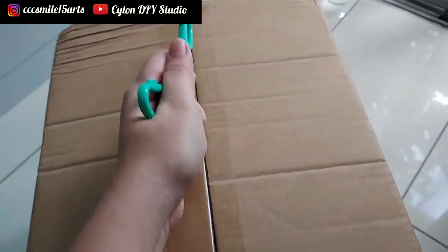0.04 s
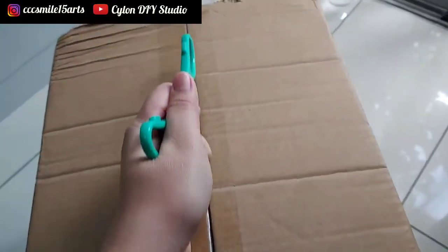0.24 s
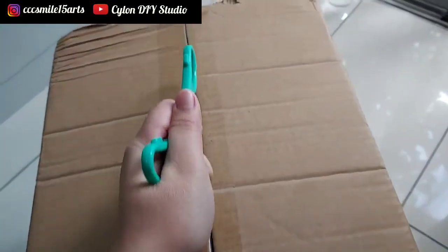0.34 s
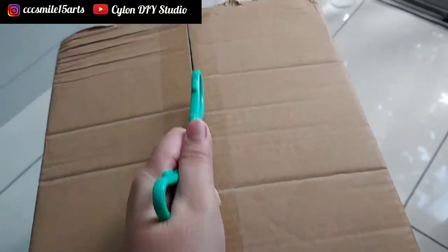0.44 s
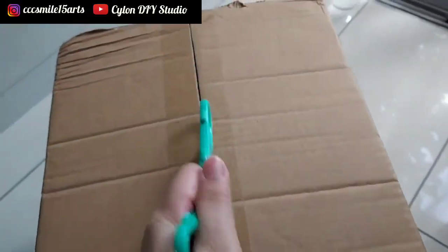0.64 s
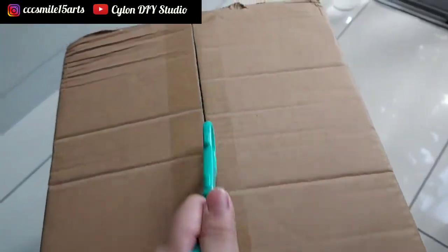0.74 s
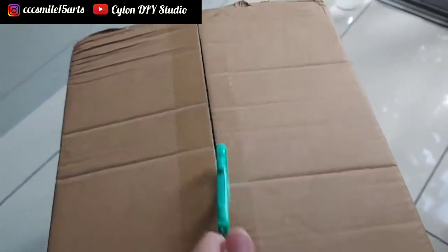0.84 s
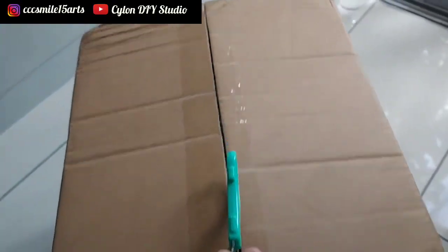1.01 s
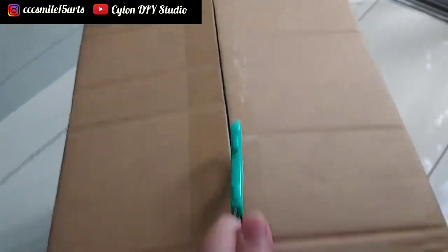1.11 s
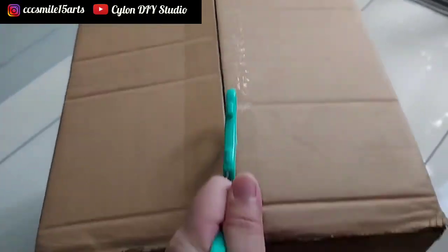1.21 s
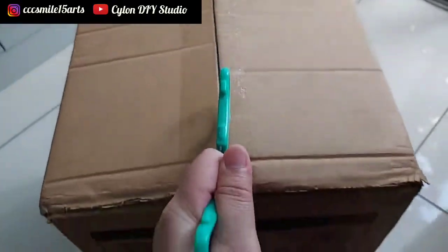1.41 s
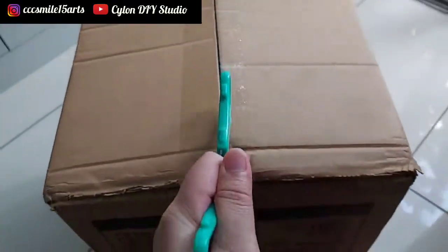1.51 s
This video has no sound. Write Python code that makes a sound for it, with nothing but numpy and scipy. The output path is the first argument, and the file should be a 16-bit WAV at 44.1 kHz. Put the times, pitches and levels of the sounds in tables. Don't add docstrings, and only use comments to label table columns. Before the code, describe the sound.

A scissor blade slits the taped seam of a big cardboard box, close in stereo. From 0.1 to 0.6 s it sticks and jumps: short hissy rips, fibre cracks, hollow thumps. The loudest snap comes at 0.72 s, then a grainy scrape with boxy hum, weakening after 1.0 s. Near silence about 1.2-1.3 s, then gentler scraping to 1.5 s. Slight hard-room echo, faint low air noise.

```python
import sys
import numpy as np
from scipy import signal
from scipy.io import wavfile

SR = 44100
rng = np.random.default_rng(int(sys.argv[2]) if len(sys.argv) > 2 else 0)


def level_to_linear(level):
    exponent = np.asarray(level, float) / 20
    return 10 ** exponent


def dump_mix(stems):
    frames = np.atleast_2d(stems).T
    limited = np.clip(frames, -1, 1)
    pcm = np.round(limited * 32767).astype(np.int16)
    wavfile.write(sys.argv[1], SR, pcm)


N = 68355

# (pitch [Hz], level when struck [dB], t60 [s], level when rubbed [dB])
BOX_MODES = [(94, -13, 0.046, -12), (133, -16.5, 0.15, -23.5), (169.2, -8, 0.11, -2),
             (206.7, -20.5, 0.19, -9), (306.8, -2, 0.093, -14), (385, -13.5, 0.08, -3.5),
             (480, -8.5, 0.026, -30.5), (567, -10, 0.0239, -19), (697, -16.5, 0.066, -16),
             (798, -18.5, 0.049, -27.5), (1260, -27, 0.018, -14), (1490, -40, 0.012, -20.5),
             (2280, -24, 0.036, -33), (3190, -27.5, 0.0084, -27.5)]


def rms_one(x):
    return x / np.sqrt(np.mean(x ** 2) + 1e-20)


def at_hz(points, hz):
    points = np.array(points)
    return np.interp(np.log(hz), np.log(np.maximum(points[:, 0], 1)), points[:, 1])


def drift(rate_hz):
    r = np.exp(-2 * np.pi * rate_hz / SR)
    settle = 9000
    return rms_one(signal.lfilter([1], [1, -2 * r, r * r], rng.standard_normal(N + settle))[settle:])


def ring(clicks, hz, t60_s):
    r = np.exp(-np.log(1000) / (t60_s * SR))
    w = 2 * np.pi * hz / SR
    return signal.lfilter([1, -1], [1, -2 * r * np.cos(w), r * r], clicks + 1e-18)


def unit_click(length):
    click = np.zeros(length)
    click[0] = 1
    return click


def sides(hz, k):
    split_hz = 5500
    return 1 + np.clip(hz / split_hz, 0, .8) * (-1) ** k * np.array([[1], [-1]])


def banded_noise(spectrum, patchy_db):
    # (frequency [Hz], left-right likeness [-1..1])
    likeness = [(60, 0.683), (180, -0.25), (550, -0.16), (1650, -0.63), (4970, 0.075), (15000, -0.13)]
    # (frequency [Hz], left minus right [dB])
    lean_db = [(60, 0), (150, 13.5), (380, -10), (950, 10), (2380, 3), (5980, -6), (15000, -3)]
    out = 0
    edges_hz = 32 * 2 ** np.arange(0, 9.3, .5)
    white = rng.standard_normal((2, 2, N))
    for k, (low, high) in enumerate(zip(edges_hz, edges_hz[1:])):
        hz = np.sqrt(low * high)
        if hz < spectrum[0][0] / 2 or hz > spectrum[-1][0] * 2:
            continue
        band = signal.butter(2, [low, high], "band", fs=SR, output="sos")
        mid, side = signal.sosfilt(band, white[k % 2])
        alike = np.clip(at_hz(likeness, hz), -1, 1)
        lean = level_to_linear(at_hz(lean_db, hz) / 2 * np.array([[1], [-1]]))
        gain = level_to_linear(at_hz(spectrum, hz) + patchy_db * drift(9.5))
        out = out + gain * lean * (np.sqrt(1 + alike) * mid + np.sqrt(1 - alike) * side * [[1], [-1]])
    return rms_one(out)


def air():
    # (frequency [Hz], density [dB per Hz])
    air_spectrum = [(30, 10.5), (70, 12.5), (170, -8.5), (380, -5.5), (900, -18), (1400, -17), (1900, -31),
                    (16000, -28.5)]
    return level_to_linear(-63.5) * banded_noise(air_spectrum, patchy_db=2.5)


def room(x):
    t60_s, wall_cut_hz, level_db = 0.22, 10000, -20
    out = np.zeros((2, N))
    dull = np.exp(-2 * np.pi * wall_cut_hz / SR)
    lags = (rng.uniform(.011, .035, size=12) * SR).astype(int)
    for k, lag in enumerate(lags):
        loop, state = x.copy(), [0.]
        gain = level_to_linear(-60 * lag / SR / t60_s)
        for i in range(lag, N, lag):
            back, state = signal.lfilter([gain * (1 - dull)], [1, -dull], loop[i - lag:i], zi=state)
            loop[i:i + lag] += back[:N - i]
        out[k % 2] += (loop - x) * (-1) ** (k // 2)
    return level_to_linear(level_db) * out


def ticks():
    # (time [s], peak [dB], pitch [Hz], t60 [s])
    cracks = [(.1125, -39, 2270, 0.029), (.2075, -35, 2220, 0.018), (.2405, -31.5, 2200, 0.012),
              (.242, -29.5, 1200, .01), (.252, -34, 1640, 0.009), (.266, -26, 1360, 0.011),
              (.289, -37, 2250, 0.0065), (.2985, -33, 1210, 0.0055), (.341, -36, 710, 0.036),
              (.3925, -27, 990, .01), (.47, -33.5, 1350, 0.018), (.4905, -33, 3550, 0.011),
              (.498, -38, 1130, 0.013), (.503, -28, 1210, .015), (.520, -36, 1290, 0.022),
              (.594, -27, 723, 0.022), (.7135, -25.5, 1096, 0.015), (.7172, -20, 3130, .002),
              (.7174, -24, 1900, 0.0021), (.7175, -18, 1210, 0.015), (.727, -28.5, 2290, 0.012),
              (.838, -33.5, 785, 0.032), (.926, -35, 690, .015), (.937, -37, 1960, 0.01),
              (.948, -34, 2060, .012), (.951, -35, 1500, 0.027), (.9775, -30.5, 1470, 0.013),
              (.978, -31.5, 2050, 0.0094), (.979, -35, 3060, 0.015), (.996, -41, 1580, 0.012),
              (1.025, -37, 2250, 0.018), (1.024, -47, 720, .012), (1.074, -37, 710, 0.035),
              (1.075, -45, 1470, 0.024), (1.086, -39, 2460, 0.0067), (1.103, -34.5, 1460, 0.033),
              (1.108, -37.5, 740, 0.091), (1.123, -39, 1280, 0.0058), (1.142, -39, 1333, 0.017),
              (1.323, -58, 1250, 0.026), (1.336, -51, 700, .02), (1.388, -35, 385, 0.077),
              (1.39, -46, 1190, 0.033), (1.411, -33.5, 385, 0.061), (1.434, -51, 750, 0.018)]
    out = np.zeros((2, N))
    for k, (s, db, hz, t60_s) in enumerate(cracks):
        i = int(s * SR)
        click = unit_click(min(N - i, 3000))
        tone = ring(ring(click, hz * 0.885, 0.0027), hz, t60_s)
        out[:, i:i + len(click)] += level_to_linear(db) * tone / np.abs(tone).max() * sides(hz * 0.25, k)
    return out


def crackle(rub):
    snaps_per_s, ring_cycles, low_hz, high_hz = 1500, 14, 521, 3140
    sizes = level_to_linear(3.2 * np.minimum(rng.exponential(1, N), 4)) * rng.choice([-1, 1], N)
    born = rng.random(N) < snaps_per_s * level_to_linear(2.5 * drift(30)) / SR
    snaps = rms_one(sizes * born) * rub
    dealt = rng.integers(0, 16, size=N)
    out = np.zeros((2, N))
    for k, hz in enumerate(np.geomspace(low_hz, high_hz, num=16)):
        t60_s = ring_cycles / hz
        tone = ring(snaps * (dealt == k), hz, t60_s) / np.sqrt(t60_s * SR / 28)
        out += np.array([tone, np.roll(tone, rng.integers(-8, 9))])
    return out


def board_noise(rub, tug):
    # (frequency [Hz], density [dB per Hz])
    rustle_spectrum = [(40, -3.5), (100, -35), (300, -12.5), (700, -10), (950, -25), (1400, -20),
                       (3400, -21), (5000, -31.5)]
    tear_hz = [667, 3386]
    rustle = rub * banded_noise(rustle_spectrum, patchy_db=4.0)
    tear_band = signal.butter(2, tear_hz, "band", fs=SR, output="sos")
    common, *own = signal.sosfilt(tear_band, rng.standard_normal((3, N)))
    tear = tug * rms_one(common + np.array(own) / 2)
    return rustle + level_to_linear(-6) * crackle(rub) + tear


def film_hiss(slide, rip):
    # (frequency [Hz], density [dB per Hz])
    film_spectrum = [(600, -27), (1200, -12.5), (2500, -8.5), (4200, -17.5), (5500, -6.5), (9000, -8.5),
                     (14500, -7.5), (16000, -12)]
    return np.sqrt(slide ** 2 + rip ** 2) * banded_noise(film_spectrum, patchy_db=2.43)


def hum(load, skid_load):
    grains_per_s, grain_spread_db = 2500, 3.0
    out = 0
    born = rng.random(N) < grains_per_s / SR
    sizes = level_to_linear(grain_spread_db * np.minimum(rng.exponential(1, N), 5))
    for k, (hz, struck_db, t60_s, rubbed_db) in enumerate(BOX_MODES):
        grains = rms_one(born * sizes * rng.standard_normal(N))
        push = grains * (level_to_linear(rubbed_db) * load + level_to_linear(struck_db) * skid_load)
        out = out + sides(hz, k) * ring(push, hz, t60_s) / np.sqrt(t60_s * SR / 28)
    return out


def rocking(box):
    # (pitch [Hz], level [dB], t60 [s])
    flap_modes = [(232, -15, 0.047), (600, -8, 0.02), (1500, -8, .004)]
    swing = 0
    for hz, db, t60_s in flap_modes:
        ahead = np.gradient(box) * SR / (2 * np.pi * hz)
        swing = swing + level_to_linear(db) * ring(ahead, hz, t60_s) * 2 * np.log(1000) / (t60_s * SR)
    return swing * np.array([[1], [-1]])


def drag():
    # (time [s], scrape [dB], load on the box [dB], scratch of the board [dB])
    course = [(0.703, -85, 24.5, 5), (0.721, -43.5, 8, 4.5), (.80, -45, 13.5, 6.5),
              (0.859, -43.5, 8.5, 1.5), (0.9, -54, 9, 5), (0.921, -44.5, 10, 0), (0.977, -47.5, 12.5, 4.5),
              (1.012, -54.5, 9, 6.5), (1.034, -52.5, 13, 4), (1.108, -50, 13.5, 5.5), (1.164, -57, 13, -4),
              (1.199, -77, 16, 6), (1.25, -82, 13.5, 1), (1.305, -74.5, 10.5, -17), (1.331, -60, 13, -3.5),
              (1.394, -55, 10, 1), (1.47, -52.5, 11, -0.5), (1.55, -52, 5.5, 4)]
    s, *columns = np.transpose(course)
    return [np.interp(np.arange(N) / SR, s, column) for column in columns]


def skids():
    # (time [s], level [dB], hold [s], fade to silence [s], load on the box [dB])
    slips = [(0.001, -55, 0.0019, 0.056, 4), (0.002, -83, 0.07, 0.19, 23), (0.09, -59, 0.015, .1, 11.5),
             (0.105, -46, 0.011, 0.19, 10.5), (0.182, -52.5, 0.094, 0.31, 15),
             (0.232, -46.5, 0.044, 0.36, 10.5), (0.331, -50, 0.01, 0.39, 2),
             (0.382, -53.5, 0.011, 0.083, 22.5), (0.394, -44, 0.0146, 0.24, 6),
             (0.45, -47, 0.084, 0.078, 13.5), (0.478, -42.5, 0.032, 0.21, 5),
             (0.582, -41.5, 0.0086, 0.19, 7.5), (0.674, -67, 0.21, 0.47, 20)]
    rise_s = 0.0049
    t, power, load = np.arange(N) / SR, np.zeros(N), np.zeros(N)
    for s, db, hold_s, fade_s, load_db in slips:
        age = np.maximum(t - s, 0)
        fade = np.exp(-np.log(1000) * np.maximum(age - hold_s, 0) / fade_s)
        shape = level_to_linear(db) * (1 - np.exp(-age / rise_s)) * fade
        power += shape ** 2
        load += (shape * level_to_linear(load_db)) ** 2
    return power, load


def rips():
    # (time [s], peak [dB], width [s], share in the board [dB])
    bursts = [(0.1103, -46, 0.0016, 4), (0.189, -34, 0.00083, -2), (0.206, -26, 0.0014, -5),
              (0.2397, -27.5, 0.0011, 0), (0.2431, -24, 0.0011, -0.5), (0.264, -24.5, 0.0011, -7),
              (0.281, -25.5, 0.0015, -5), (0.3405, -28.5, 0.0012, -26), (0.391, -24, 0.0031, -20),
              (0.4694, -22.5, 0.0014, -25), (0.4894, -21.5, 0.0022, -22), (0.4964, -46, 0.00099, -4),
              (0.5143, -26, 0.0018, -10), (0.587, -43.5, 0.0028, 5.5), (0.5937, -28, 0.002, -5),
              (0.706, -39, 0.0095, 9), (0.7108, -30.5, 0.002, 4), (0.7161, -17.5, 0.0014, -0.5),
              (0.816, -30, 0.0032, -10), (0.9198, -47, 0.0012, -5), (0.9606, -37, 0.0011, 2),
              (0.9771, -22, 0.0011, -3), (1.023, -31, 0.0019, -2), (1.271, -61, 0.0026, -8),
              (1.446, -28.5, 0.00098, -13)]
    t, power = np.arange(N) / SR, np.zeros((2, N))
    for s, db, width_s, board_db in bursts:
        age = np.maximum(t - s, 0) / max(width_s, .0003)
        shape = (age * np.exp(1 - age)) ** np.array([[1], [2]])
        power += (level_to_linear(db - 10.5 + np.array([[0], [board_db]])) * shape) ** 2
    return np.sqrt(power)


def thumps():
    # (time [s], peak [dB], panel pitch [Hz], box hum [dB])
    jumps = [(.112, -23, 297, 0), (0.1187, -25.5, 316, -6.5), (.205, -31, 486, -27),
             (.208, -14.5, 295, -6.5), (0.2152, -25, 295, -9), (0.2406, -16.5, 466, -2),
             (0.2517, -18.5, 347, -9), (0.263, -23.5, 400, 5.5), (0.2798, -15, 420, -5.5),
             (.342, -20, 306, -1.5), (0.3929, -24.5, 627, 6.5), (0.3953, -11.5, 366, -17.5),
             (.469, -23, 540, -4.5), (0.4944, -24, 392, 6), (0.4973, -13.5, 430, -5.5),
             (0.502, -23.5, 320, 6), (0.5144, -17, 350, -10.5), (0.52, -21.5, 163, -8),
             (0.5868, -23, 285, -10), (.596, -18.5, 341, -2), (.655, -38, 316, -1),
             (0.7143, -16.5, 480, -9), (0.718, -2, 408, -17.5), (0.7235, -10.5, 297, -13.5),
             (0.745, -21.5, 394, -21), (0.7602, -18.5, 480, -27), (0.839, -23.5, 416, -14),
             (0.904, -25.5, 169, -7.5), (.914, -36, 174, 1), (1.026, -37.5, 385, 4.5),
             (1.441, -42, 169, -10)]
    panel_cycles, rise_cycles, level_db = 4.36, 3.05, -0.5
    out, knocks = np.zeros((2, N)), np.zeros((len(BOX_MODES), N))
    luck = rng.standard_normal((len(jumps), len(BOX_MODES)))
    for (s, db, hz, hum_db), row in zip(jumps, luck):
        i = int(s * SR)
        click = unit_click(min(N - i, 4000))
        swing = ring(ring(click, hz * 0.91, rise_cycles / hz), hz, panel_cycles / hz)
        out[:, i:i + len(click)] -= level_to_linear(db + level_db) * swing / np.abs(swing).max()
        knocks[:, i] += level_to_linear(db + hum_db + 2.8 * row) * np.sign(row)
    knocks = signal.lfilter([.15], [1, -.85], knocks)
    for k, (hz, struck_db, t60_s, _) in enumerate(BOX_MODES):
        out = out + level_to_linear(struck_db) * ring(knocks[k], hz, t60_s) * sides(hz, k)
    return out


def scene():
    t, right_lag_s = np.arange(N) / SR, .00005
    scrape_db, load_db, board_db = drag()
    skid, skid_load = skids()
    rip, tug = rips()
    flutter = level_to_linear(1 * drift(32))
    slide = flutter * np.sqrt(level_to_linear(scrape_db) ** 2 + skid)
    box = thumps() + ticks() + hum(flutter * level_to_linear(scrape_db + load_db), flutter * np.sqrt(skid_load))
    box_at_ports = np.array([box[0], np.interp(t - right_lag_s, t, box[1])]) + rocking(box.mean(axis=0))
    near = box_at_ports + film_hiss(slide, rip) + board_noise(slide * level_to_linear(board_db - 0.5), tug)
    return near + room(near.mean(axis=0)) + air()


def top_cut(x):
    return signal.sosfilt(signal.butter(12, 16430, fs=SR, output="sos"), x)


def record(dry):
    x = signal.sosfilt(signal.butter(3, 62, "high", fs=SR, output="sos"), dry)
    x = signal.sosfilt(signal.cheby2(22, 70, 16150, fs=SR, output="sos"), x)
    return top_cut(x)


dry = scene()
out = record(dry)
dump_mix(out)
```